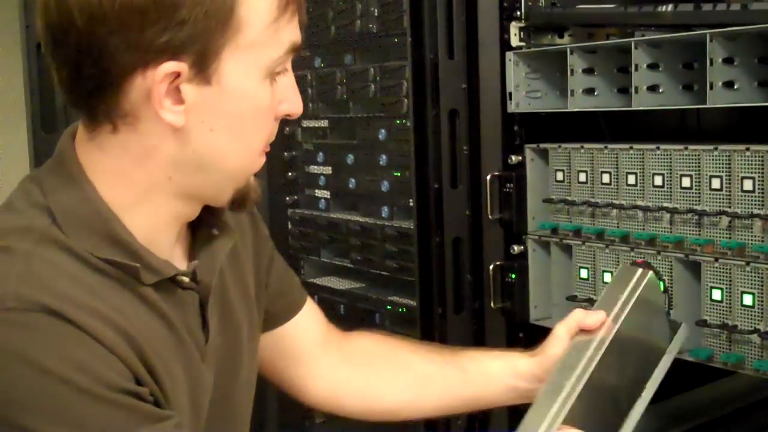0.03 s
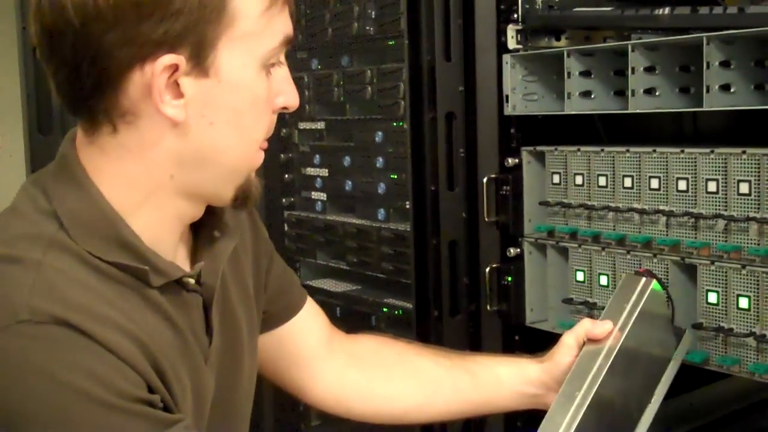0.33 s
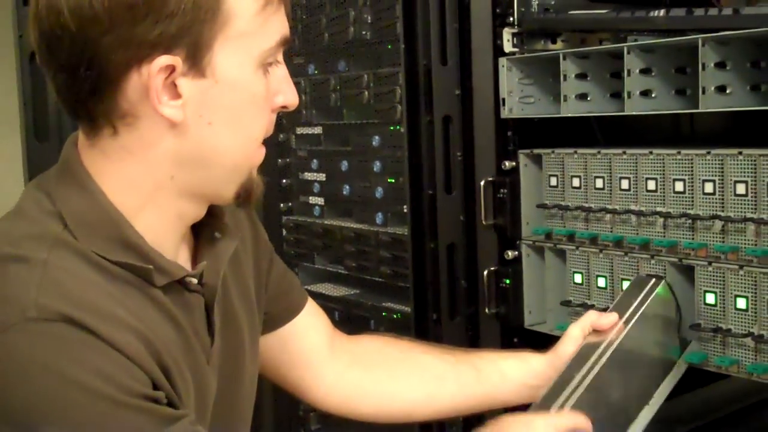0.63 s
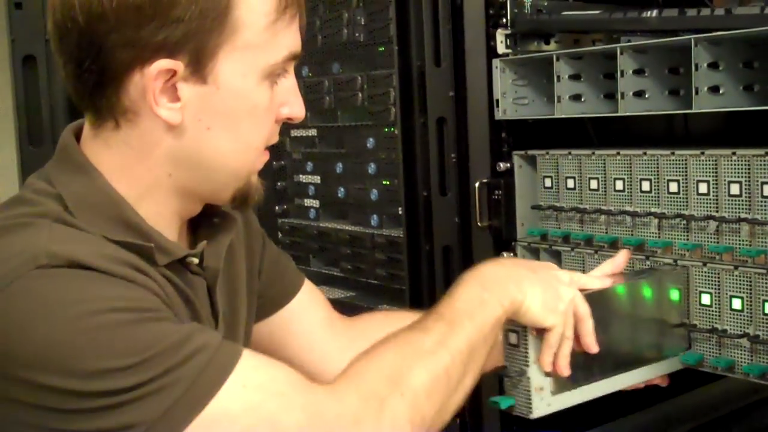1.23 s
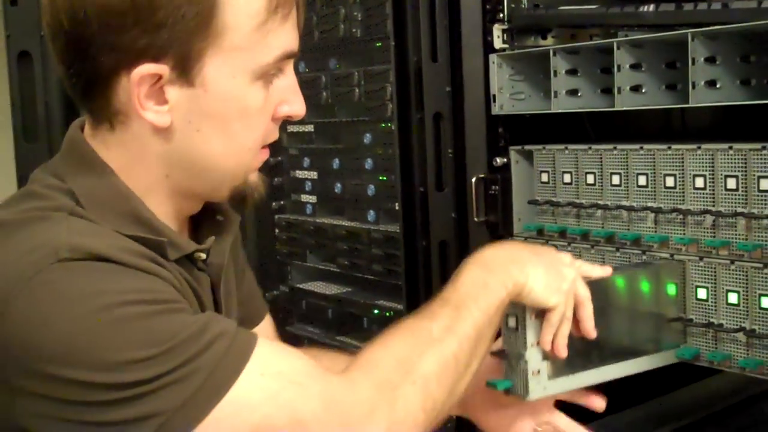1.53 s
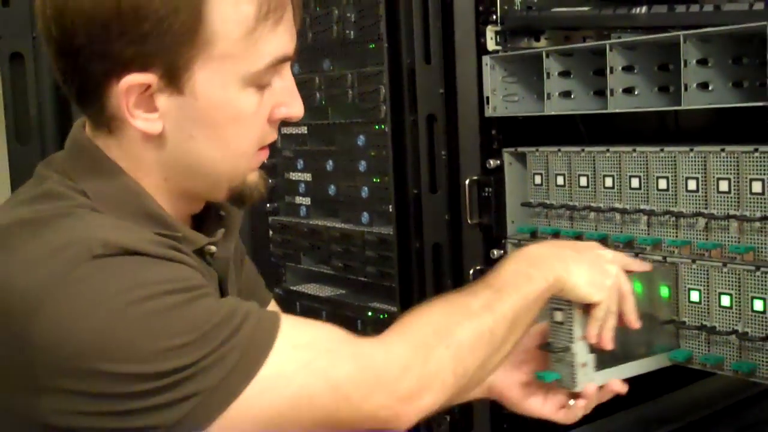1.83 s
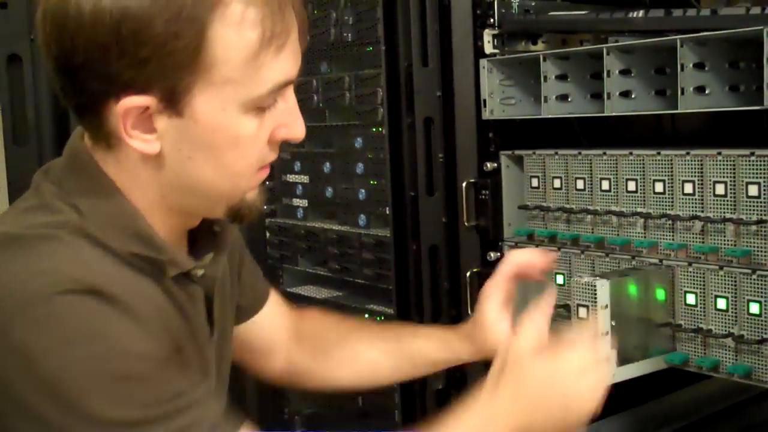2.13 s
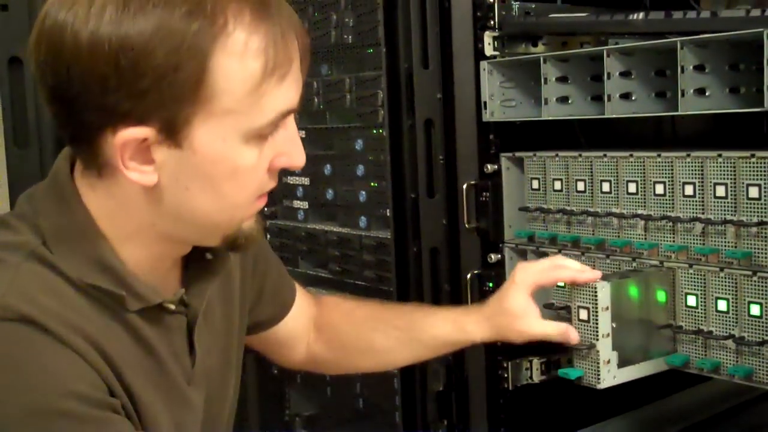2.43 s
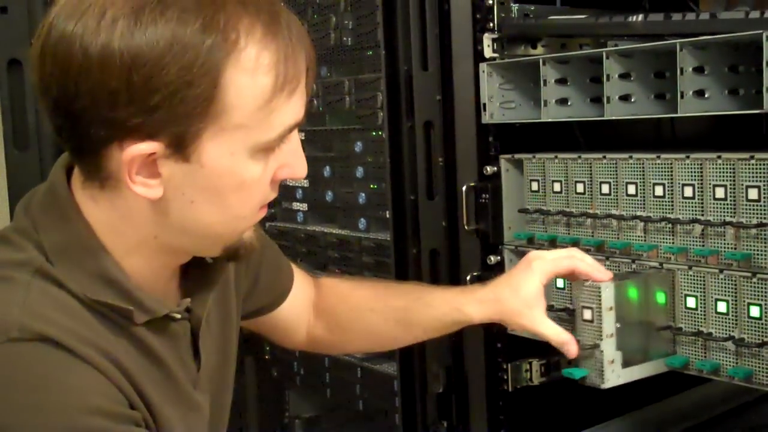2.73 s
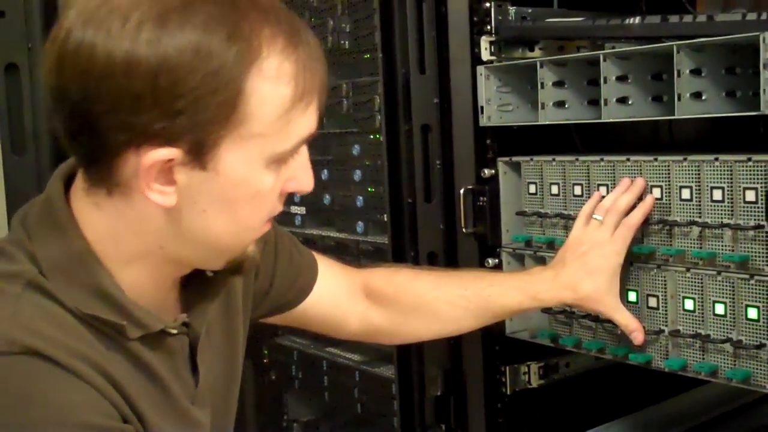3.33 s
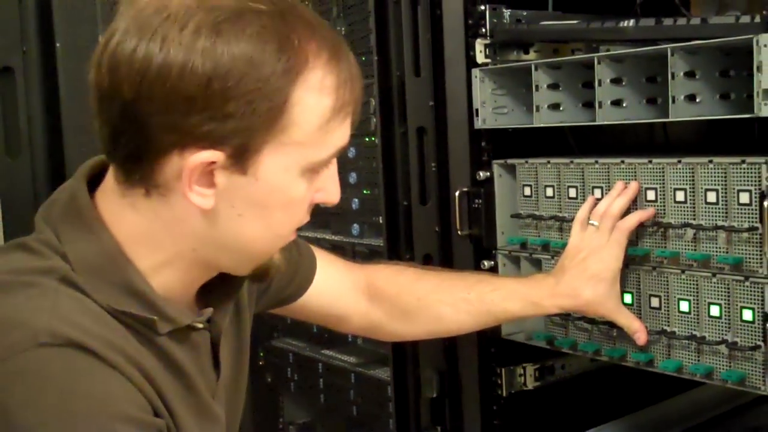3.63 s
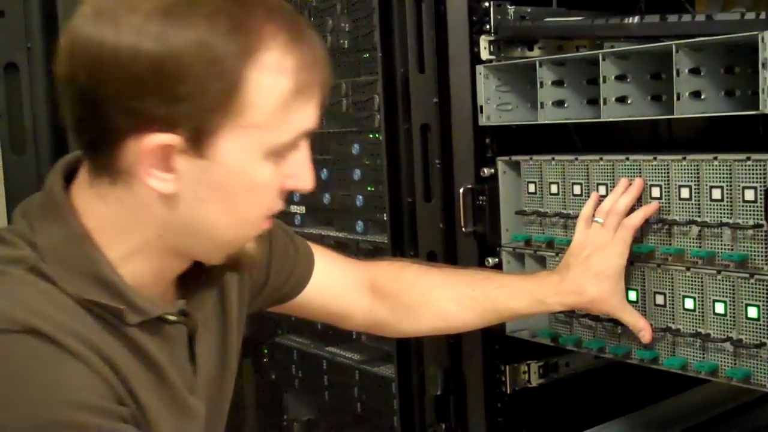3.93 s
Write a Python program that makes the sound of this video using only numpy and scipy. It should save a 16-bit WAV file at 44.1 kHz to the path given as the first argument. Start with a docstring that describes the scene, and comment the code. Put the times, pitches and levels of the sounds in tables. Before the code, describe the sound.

Server cooling fans roar steadily with a wavering whine, close by in a server room. A metal module knocks lightly as it goes into its case, then latches with one sharp click near the end.

```python
"""A steady roar of rushing air fills a machine room, with the wavering whine of many server fans.
Swirling air makes the roar; spinning blades make tones that beat (swell and fade) against each other.
A module rubs along its rails, knocks lightly on its metal case and latches with one sharp click.
The microphone's two openings ring at different pitches, and a limiter (an automatic volume control)
turns everything down after the click."""
import sys
import numpy as np
from scipy import signal
from scipy.fft import rfft, irfft
from scipy.io import wavfile
from scipy.ndimage import uniform_filter1d

SR = 44100
rng = np.random.default_rng(int(sys.argv[2]) if len(sys.argv) > 2 else 0)


def bounce(signal):
    """Save signal as a 16-bit WAV file at the path given by the first command-line argument."""
    frames = np.transpose(np.atleast_2d(signal))
    limited = np.clip(frames, -1, 1)
    pcm = np.round(limited * 32767).astype(np.int16)
    wavfile.write(sys.argv[1], SR, pcm)


N = 176400
TIME = np.arange(N) / SR
FREQS = np.maximum(np.arange(N // 2 + 1) * SR / N, 1)


def rushing_air():
    """Air swirling through many fans makes a nearly steady roar, with a hiss on top."""
    # tone colour of the roar: (frequency [Hz], level per Hz [dB])
    roar_colour = [(20, -74), (35, -85), (50, -74), (90, -74.5), (150, -72), (210, -68), (270, -62.5),
                   (305, -66.5), (360, -58.5), (440, -61), (490, -57.5), (570, -59.5), (650, -54),
                   (800, -54.5), (920, -53.5), (1050, -56), (1180, -56.5), (1380, -54), (1600, -57.5),
                   (1800, -57), (2050, -56), (2300, -57.5), (2560, -55.5), (2800, -60), (3300, -58.5),
                   (4000, -59.5), (16000, -58)]
    # how alike left and right are, 1 = same, -1 = opposite: (frequency [Hz], likeness [-1 to 1])
    ear_likeness = [(25, -0.86), (45, 0.18), (70, 0.11), (120, 0.97), (400, 0.99), (800, 0.96),
                    (1200, 0.84), (2000, .8), (3200, 0.54), (5300, 0.68), (8700, 0.85), (14000, .05)]
    # slow rise and fall of the hiss: (time [s], level change [dB])
    hiss_changes = [(0, -0.5), (.3, 1.5), (1.05, 0), (1.3, -1.7), (1.8, -0.8), (2.55, -0.3), (3.3, -0.4),
                    (4, -1.5)]
    flicker_db = 0.67
    shared, opposed = rng.standard_normal((2, N)) * np.sqrt(SR / 2)
    alike = at_hz(ear_likeness)
    noise = shaped(shared, np.sqrt((1 + alike) / 2))
    noise = noise + shaped(opposed, np.sqrt((1 - alike) / 2)) * [[1], [-1]]
    roar = shaped(noise, from_db(at_hz(roar_colour) + 0.1))
    hiss = shaped(roar, band(centre_hz=6000, octaves=.45))
    roar = roar - hiss + hiss * from_db(in_time(hiss_changes))
    return roar * from_db(flicker_db * drift(rate_hz=13))


def beating_whine():
    """The loudest blade tone swells and cancels as it beats with slightly faster fans nearby."""
    # swells and dips of the whine: (time [s], relative level [dB])
    swells = [(0.0, -18), (0.03, -30), (0.07, -19), (0.11, -38), (0.14, -27), (0.18, -30), (0.21, -22.5),
              (0.46, -23), (0.49, -31), (0.52, -24), (0.56, -39), (0.59, -19.5), (0.63, -31), (0.68, -15.5),
              (0.72, -35), (0.75, -21), (0.88, -34), (0.91, -22.5), (0.95, -27.5), (0.99, -19), (1.04, -27),
              (1.08, -17.5), (1.11, -35), (1.16, -22), (1.19, -38), (1.25, -20.5), (1.27, -31),
              (1.32, -20.5), (1.38, -24), (1.43, -19), (1.49, -25.5), (1.55, -18), (1.6, -26.5),
              (1.65, -21), (1.73, -33), (1.77, -27.5), (2.22, -20.5), (2.49, -22), (2.67, -27), (2.74, -46),
              (2.81, -29), (2.85, -41), (2.87, -28), (3.09, -26.5), (3.11, -31), (3.17, -17.5), (3.24, -39),
              (3.27, -24.5), (3.33, -20), (3.36, -31), (3.44, -21), (3.5, -29.5), (3.54, -19.5),
              (3.63, -29.5), (3.69, -17), (3.73, -25.5), (3.82, -20), (3.87, -30), (3.92, -17.5),
              (4.0, -27.5)]
    pitch_hz, boost_db = 851.8, 1.3
    log_gain = (in_time(swells) + boost_db) * np.log(10) / 20
    log_gain = uniform_filter1d(log_gain, size=500)
    # hilbert adds the shift in the wave's timing (its phase) that goes with each dip
    beating = np.exp(signal.hilbert(log_gain))
    tone = np.sqrt(2) * np.real(beating * np.exp(2j * np.pi * pitch_hz * TIME))
    return panned(tone, pan_db=-1.4)


def fan_tones():
    """Each of the other fans wanders a little in speed, and its tone flutters in the moving air."""
    # blade tones, overtones and mains hum: (pitch [Hz], level [dB], left minus right [dB])
    tones = [(100, -63, 0), (120, -53.5, 0), (515.5, -42, -1), (678, -40.5, -1), (765, -39, -1),
             (861.5, -38, -1), (918, -46, 0), (970.5, -32.5, -2), (983, -35, -1), (985.7, -41, -1),
             (1004, -46, 0), (1114, -44.5, 0), (1529, -46, 0), (1677, -44, 0), (1696, -42, 0),
             (1706, -38, -1), (1723, -39.5, -1), (1965, -40, -1), (2008, -42, 0), (2035, -45, 0),
             (2544, -41, 0), (2557, -35.5, 0), (2589, -43, 0), (2910, -47, 0), (3011, -46, -1),
             (3410, -47, 0), (4264, -45, -1), (4301, -48, 0), (5120, -42, -1), (5970, -41, -1),
             (6826, -48, 0), (10516, -48, 0)]
    wander_fraction, flutter_db = 0.000507, 1.44
    mix = np.zeros((2, N))
    for hz, db, pan_db in tones:
        start_cycle = rng.random()
        pitch_hz = hz * (1 + wander_fraction * drift(rate_hz=1.67))
        cycles = start_cycle + np.cumsum(pitch_hz) / SR
        gain = np.sqrt(2) * from_db(db + flutter_db * drift(rate_hz=7.5))
        mix += panned(gain * np.sin(2 * np.pi * cycles), pan_db)
    return mix


def knocks_and_latch():
    """Each contact of the module is a short, bright click with a faint tail, and sets the case ringing."""
    # bumps on the way in: (time [s], relative click level [dB], relative knock level [dB])
    bumps = [(.876, -8, -10), (.879, -12, -8.5), (.884, -17, -14), (3.238, -22, -34)]
    # the latch snaps home in a quick run of slips: (time [s], relative level [dB])
    latch_slips = [(3.6200, -0.5), (3.622, 0.5), (3.6222, -2), (3.6247, 1.5), (3.6267, -9)]
    # tone colour of a click: (frequency [Hz], gain [dB])
    click_colour = [(60, -45), (300, -20), (1200, -4.5), (3000, -6), (5500, -7), (6400, -3.5), (7200, 2.5),
                    (8300, 5.5), (10000, -5), (14000, -1)]
    # ringing notes of the sheet-metal case: (pitch [Hz], relative level [dB], time to fade 60 dB [s])
    case_notes = [(764, -9, .02), (1030, 3.5, 0.014), (1260, -2, 0.023), (1350, -27, .025),
                  (1920, -8, 0.02), (3220, -8, .02), (5300, -8, .02)]
    click_fade_s, tail_fade_s = 0.0083, 0.083
    tail_db, latch_knock_db, low_cut_hz = -14, -13, 500
    contacts = list(bumps) + [(start_s, db, db + latch_knock_db) for start_s, db in latch_slips]
    clicks, knocks = np.zeros((2, N)), np.zeros(N)
    age = TIME[:SR // 5]
    click_fade = from_db(-60 * age / click_fade_s) + from_db(tail_db - 60 * age / tail_fade_s)
    for start_s, click_db, knock_db in contacts:
        span = slice(int(start_s * SR), int(start_s * SR) + len(age))
        clicks[:, span] += from_db(click_db) * click_fade * rng.standard_normal((2, len(age)))
        for hz, db, fade_s in case_notes:
            ring_fade = from_db(knock_db + db - 60 * age / fade_s)
            knocks[span] += rng.choice([-.5, .5]) * ring_fade * np.sin(2 * np.pi * hz * age)
    clicks = shaped(clicks, from_db(at_hz(click_colour)))
    low_cut = signal.butter(2, low_cut_hz, "high", fs=SR, output="sos")
    return signal.sosfilt(low_cut, panned(clicks, pan_db=2.5) + knocks)


def rail_rubbing():
    """Metal sliding on metal makes a faint, uneven, very high hiss."""
    # pushes along the rails: (middle time [s], half length [s], relative level [dB])
    slides = [(0.088, .04, -14), (1.98, .13, -19), (3.243, .022, -16)]
    roughness_db = 5
    gain = sum(from_db(db) * np.exp(-((TIME - middle) / half) ** 2) for middle, half, db in slides)
    rub = rng.standard_normal((2, N)) * gain * from_db(roughness_db * drift(rate_hz=60))
    return shaped(rub, band(centre_hz=12500, octaves=0.35))


def microphone_openings(sound):
    """Each opening rings at its own high pitch; the left side hears everything a tiny bit later."""
    # what the openings boost and cut: (frequency [Hz], left gain [dB], right gain [dB])
    response = [(200, -0.4, 0.3), (850, -0.43, 0.2), (3000, 0.3, 1), (3900, 0.5, 1.4), (5280, 0.8, 4),
                (6070, 3.5, 9.5), (6270, 1, 6), (7200, 6.5, -7.5), (7470, 3, -10), (8080, -3.5, -13.6),
                (8910, -11.5, -19), (10160, -16, -27), (11860, -24.5, -36.8), (14000, -27, -46)]
    left_lag_s = .00003
    left = from_db(at_hz(response, column=1)) * np.exp(-2j * np.pi * FREQS * left_lag_s)
    right = from_db(at_hz(response, column=2))
    return shaped(sound, np.array([left, right]))


def limiter(sound, limit_db=-8, recovery_db_per_s=13):
    """Turns the volume down quickly when the sound passes the limit, then lets it creep back."""
    power = smoothed(np.mean(sound ** 2, axis=0), lag_s=0.0029)
    excess_db = np.maximum(10 * np.log10(power + 1e-12) - limit_db, 0)
    recovery_db = recovery_db_per_s * TIME
    cut_db = np.maximum.accumulate(excess_db + recovery_db) - recovery_db
    return sound * from_db(-smoothed(cut_db, lag_s=.004))


def from_db(db):
    """Turns decibels into a number to multiply by (a gain)."""
    return 10 ** (np.asarray(db) / 20)


def at_hz(points, column=1):
    """Joins a table's points into a curve over all frequencies, spaced by octaves."""
    table = np.array(points)
    return np.interp(np.log(FREQS), np.log(table[:, 0]), table[:, column])


def in_time(points):
    """Joins (time, value) points with straight lines."""
    return np.interp(TIME, *np.transpose(points))


def band(centre_hz, octaves):
    """A bell-shaped gain that keeps the frequencies near its centre."""
    return np.exp(-.5 * (np.log2(FREQS / centre_hz) / octaves) ** 2)


def shaped(sound, gain):
    """Gives each frequency of a sound its own gain."""
    return irfft(rfft(sound) * gain, N)


def panned(sound, pan_db):
    """Makes the left side pan_db louder than the right."""
    return sound * from_db([[pan_db / 2], [-pan_db / 2]])


def smoothed(curve, lag_s):
    """Follows a curve with a short lag, rounding off its jumps."""
    keep = np.exp(-1 / (lag_s * SR))
    return signal.lfilter([1 - keep], [1, -keep], curve)


def drift(rate_hz):
    """A random wobble of typical size 1, mostly slower than rate_hz."""
    count = 2048
    hz = np.arange(count // 2 + 1) * SR / (2 * N)
    spectrum = rfft(rng.standard_normal(count)) / (1 + (hz / rate_hz) ** 2)
    slow = irfft(spectrum)[:count // 2]
    return np.interp(TIME, np.linspace(0, N / SR, count // 2), (slow - slow.mean()) / slow.std())


def scene():
    """The fans, and the module sliding home in front of them."""
    return rushing_air() + beating_whine() + fan_tones() + knocks_and_latch() + rail_rubbing()


def record(dry):
    """After the microphone and limiter, overloaded peaks are flattened and the highest treble is cut."""
    overload, cutoff_hz = .9, 14260
    sound = limiter(microphone_openings(dry))
    sound = np.clip(sound, -overload, overload)
    return shaped(sound, 1 / np.sqrt(1 + (FREQS / cutoff_hz) ** 400))


dry = scene()
out = record(dry)
bounce(out)
```